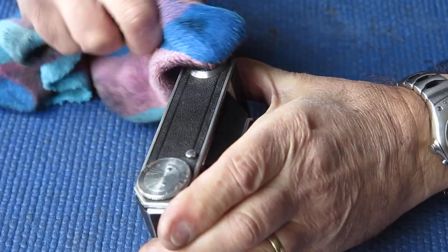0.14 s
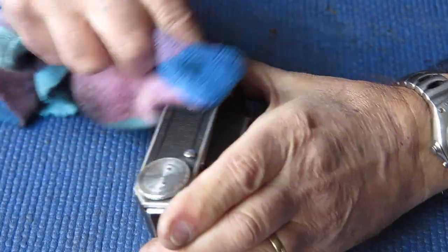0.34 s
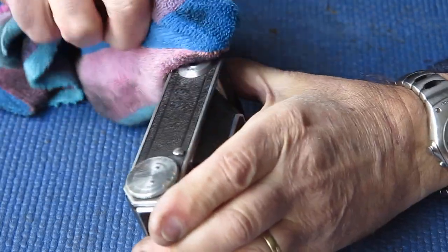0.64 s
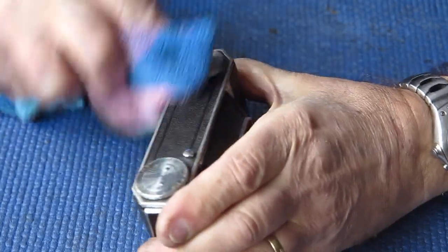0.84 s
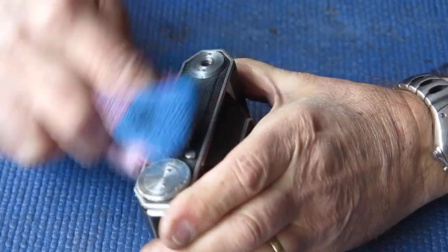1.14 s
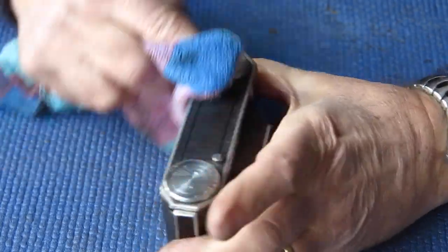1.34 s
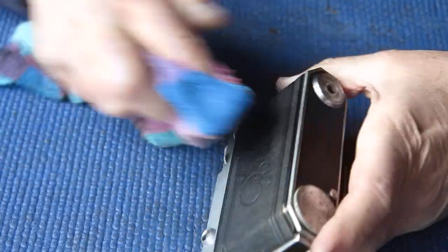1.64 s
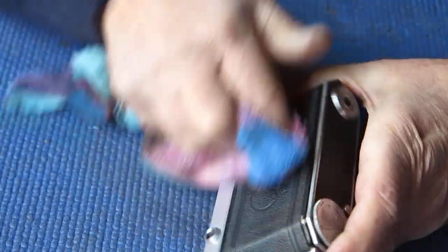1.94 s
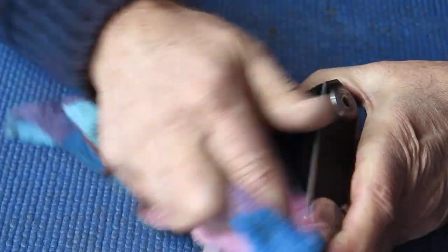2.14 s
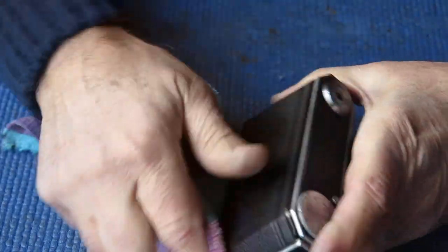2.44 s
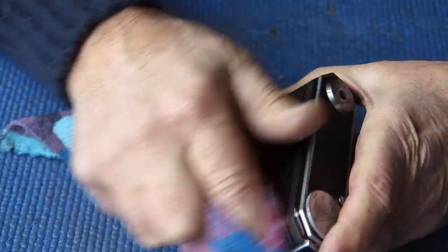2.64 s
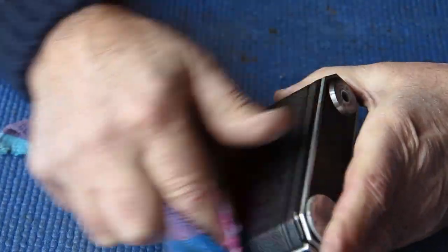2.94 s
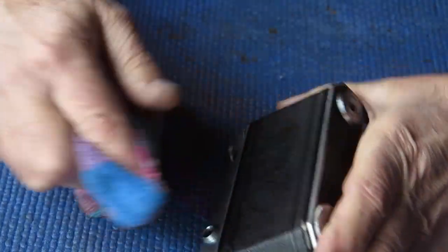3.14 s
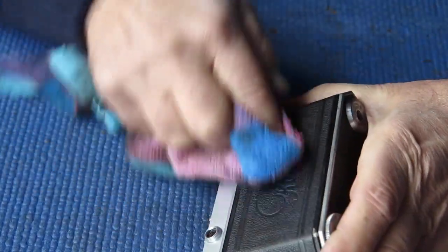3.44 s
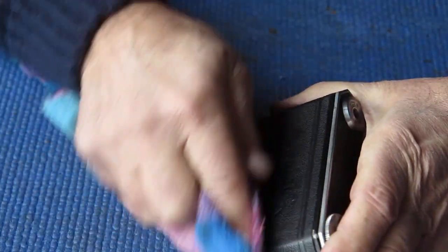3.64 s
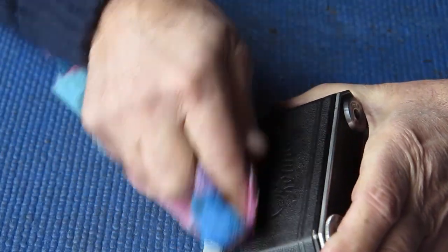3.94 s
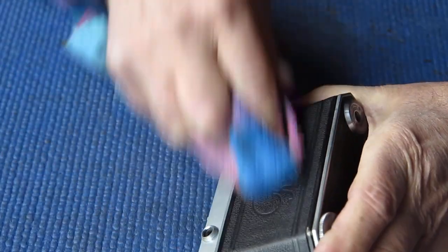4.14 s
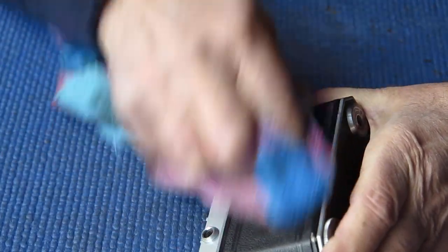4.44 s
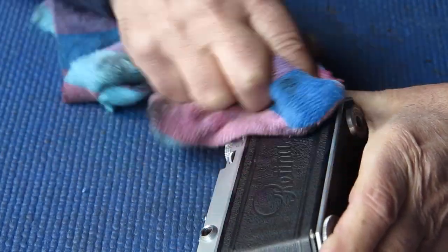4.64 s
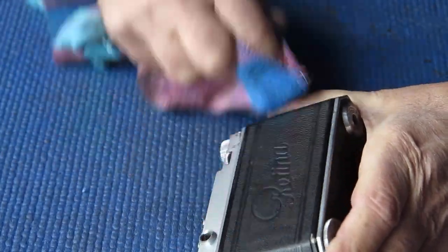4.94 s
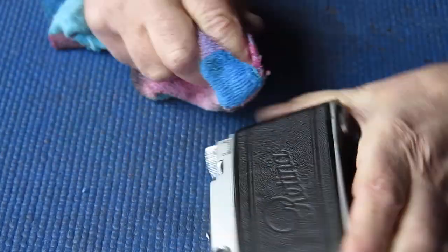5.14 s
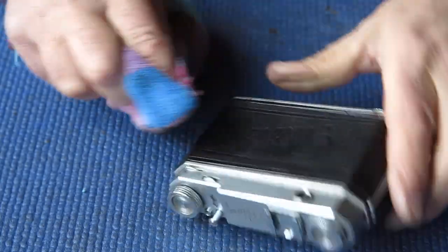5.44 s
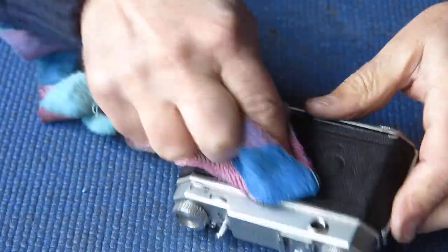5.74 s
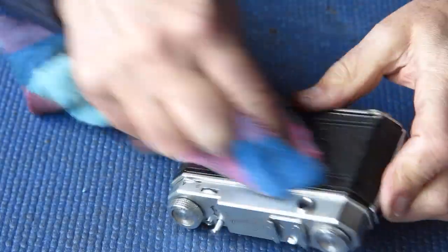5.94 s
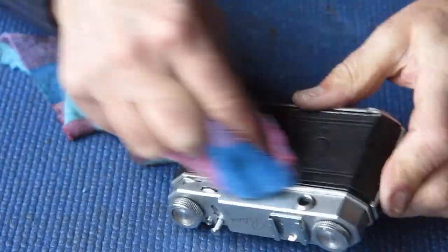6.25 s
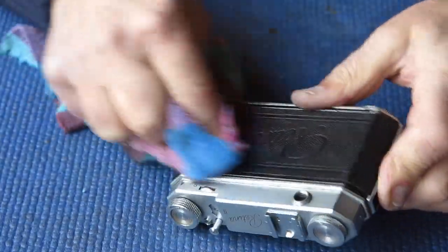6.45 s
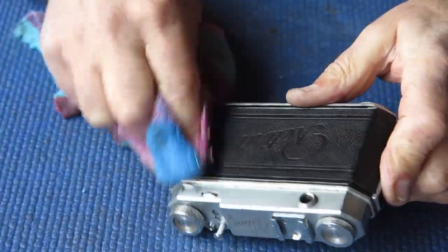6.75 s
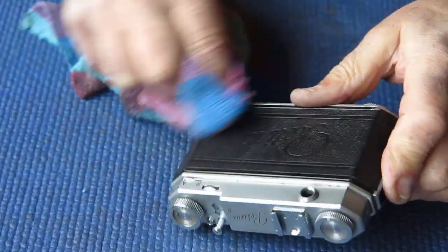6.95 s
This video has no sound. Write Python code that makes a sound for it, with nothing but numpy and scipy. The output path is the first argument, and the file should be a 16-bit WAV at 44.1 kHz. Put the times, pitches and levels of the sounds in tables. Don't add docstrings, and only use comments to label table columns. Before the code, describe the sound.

A terry cloth buffs a leather-covered hollow metal case in quick scratchy strokes, with low rumbles, knocks on a bench and a bright clink.

```python
import sys
import numpy as np
from scipy import signal
from scipy.fft import rfft, irfft, next_fast_len
from scipy.io import wavfile

SR = 44100
rng = np.random.default_rng(int(sys.argv[2]) if len(sys.argv) > 2 else 0)


def generate_wav(sig):
    pcm = np.round(np.clip(np.atleast_2d(sig).T, -1, 1) * 32767).astype(np.int16)
    wavfile.write(sys.argv[1], SR, pcm)


def gain_from_decibels(decibels):
    exponent = np.asarray(decibels, float) / 20
    return 10 ** exponent


N = 312669
SIZE = next_fast_len(N, True)
CONTROL_STEP = 64

# frequency in Hz, level in dB, 60 dB decay time in seconds.
SHELL_MODES = [(416, 8, 0.05), (518, 1, 0.073), (620, -1.5, 0.12), (735, 3.5, 0.039), (901, 8.5, 0.018),
               (1110, 3.5, 0.05), (1343, -0.5, 0.035), (1580, -12, 0.074), (1894, -19.5, 0.013)]


def cloth():
    hiss_gain, sheen_gain, scratch_gain, lower, upper, top = rubbing()
    hiss = fibre_hiss(hiss_gain, sheen_gain)
    scratch = scratch_gain * leather_scratch()
    rumble = shell_rumble(lower, upper, top)
    return gain_from_decibels(2.0) * hiss + gain_from_decibels(-1.94) * scratch + gain_from_decibels(-0.7) * rumble


def rubbing():
    # start in seconds, length in seconds, share spent speeding up (0-1),
    # hiss in dB, press on the shell in dB.
    side_strokes = [
        (0.173, 0.16, 0.61, -52.5, -58),
        (0.301, 0.16, 0.44, -51.5, -61),
        (0.438, 0.15, 0.47, -54.5, -62),
        (0.607, 0.2, 0.62, -60.5, -61),
        (0.785, 0.23, 0.28, -47, -50),
        (0.972, 0.125, 0.32, -45.5, -58),
        (1.09, 0.13, 0.28, -42, -49),
        (1.235, 0.29, 0.15, -45.5, -52.5),
    ]
    face_strokes = [(1.656, 0.26, 0.53, -42, -35), (1.853, 0.16, 0.57, -41, -34.5),
                    (1.984, 0.3, 0.2, -43, -40), (2.289, 0.22, 0.48, -45.5, -43.5),
                    (2.461, 0.18, 0.46, -44.4, -44), (2.623, 0.15, 0.36, -46.0, -49.5),
                    (2.738, 0.16, 0.34, -47.5, -47.5), (2.859, 0.24, 0.3, -48, -44.5),
                    (3.296, 0.23, 0.46, -52, -44.5), (3.474, 0.19, 0.51, -53.5, -49),
                    (3.624, 0.18, 0.44, -53.5, -54.5), (3.767, 0.19, 0.44, -56, -55.5),
                    (3.898, 0.22, 0.56, -51, -48), (4.078, 0.23, 0.33, -48.5, -42.5),
                    (4.221, 0.18, 0.46, -47, -46.5), (4.371, 0.19, 0.45, -47.5, -46),
                    (4.494, 0.19, 0.5, -46, -45), (4.649, 0.18, 0.41, -46, -38.5),
                    (4.778, 0.28, 0.35, -46.5, -41)]
    flat_strokes = [(5.485, 0.041, 0.52, -53, -62), (5.5, 0.31, 0.52, -48, -50.5),
                    (5.751, 0.15, 0.49, -52.5, -49), (5.893, 0.18, 0.21, -51.5, -40),
                    (6.007, 0.23, 0.49, -48.5, -50.5), (6.203, 0.16, 0.37, -52.5, -52.5),
                    (6.298, 0.39, 0.36, -48, -48), (6.612, 0.31, 0.23, -51, -57),
                    (6.74, 0.2, 0.58, -43, -35), (6.898, 0.16, 0.28, -47.5, -47.5),
                    (6.981, 0.2, 0.25, -48.5, -48)]
    slides = [
        (-0.1, 0.14, 0.46, -66, -64),
        (1.38, 0.23, 0.41, -47.5, -61),
        (1.48, 0.26, 0.46, -48.5, -58),
        (2.226, 0.24, 0.29, -56.5, -66),
        (3.037, 0.19, 0.41, -39.5, -80),
        (3.19, 0.23, 0.36, -51, -52),
        (5.057, 0.088, 1, -54.5, -54),
        (5.126, 0.19, 0.31, -47, -66),
        (5.232, 0.62, 0.13, -58, -63),
    ]
    # sheen dB, scratch dB, upper modes' share at top speed dB, power of speed in the shell, top modes dB
    kinds = [(side_strokes, (1, -8.5, -3.5, 2.1, -22)),
             (face_strokes, (0, -5, -2.5, 3, -10.5)),
             (flat_strokes, (1, -4.5, -1.5, 3.5, -23)),
             (slides, (-12, 1, -8, 3, -9))]
    power = 0
    for passes, (sheen_db, scratch_db, upper_db, by_speed, top_db) in kinds:
        for start, length, rising, hiss_db, shell_db in passes:
            pace = speed(start, length, rising)
            early = speed(start, length, 0.87 * rising)
            press_db = 0.15 * (shell_db - hiss_db)
            upper = np.clip(gain_from_decibels(upper_db) * pace ** 0.87, .05, .98)
            shell = gain_from_decibels(shell_db) * pace ** by_speed
            power = power + np.square([
                gain_from_decibels(hiss_db) * pace ** 1.8,
                gain_from_decibels(hiss_db + sheen_db) * early ** 2.6,
                gain_from_decibels(hiss_db + scratch_db + press_db) * pace ** 1.55,
                shell * np.sqrt(1 - upper ** 2),
                shell * upper,
                shell * pace ** 2 * gain_from_decibels(top_db)])
    points = np.arange(0, N, CONTROL_STEP)
    return [np.interp(np.arange(N), points, gain) for gain in np.sqrt(power)]


def speed(start, length, rising):
    part = np.clip((np.arange(0, N, CONTROL_STEP) / SR - start) / length, 0, 1)
    rising = np.clip(rising, .05, .95)
    return np.sin(np.pi / 2 * np.minimum(part / rising, (1 - part) / (1 - rising)))


def fibre_hiss(hiss_gain, sheen_gain):
    # frequency in Hz, level in dB per Hz.
    hiss_colour = [(1470, -1.5), (2500, -17), (3630, 1), (4020, 0.5), (4620, 0.5), (7300, 1.5), (9150, -3),
                   (11500, -11), (14500, -29.5), (16000, -65)]
    # frequency in Hz, width in Hz, lift in dB.
    port = (7150, 960, 4.2)
    slips = grains(14000, spread_db=2.0) * gain_from_decibels(1.2 * drift(20.5))
    hiss = rms_one(peaked(spread(slips, hiss_colour), [port]))
    sheen = signal.sosfiltfilt(butter(2, 8800, "high"), hiss)
    return hiss_gain * (hiss - sheen) + sheen_gain * sheen


def leather_scratch():
    # frequency in Hz, level in dB per Hz.
    scratch_colour = [(600, -20), (950, 4), (1250, -8), (1700, -3), (2300, -0.5), (3200, 0.5), (5000, -27)]
    catches = grains(5000, spread_db=2.5) * gain_from_decibels(1.2 * drift(53))
    return spread([[1], [.7]] * catches, scratch_colour)


def shell_rumble(lower, upper, top):
    catches = grains(1500, spread_db=1.8) * gain_from_decibels(2.0 * drift(67))
    modes = [rms_one(ring(catches, hz, .5 * t60)) * (-1) ** k
             for k, (hz, db, t60) in enumerate(SHELL_MODES)]
    palm, free = butter(2, [340, 1000], "band"), butter(2, 1000, "high")
    near = [[1], [.45]]
    rumble = lower * spread(near * signal.sosfilt(palm, sum(modes[:3])))
    rumble = rumble + upper * spread(near * signal.sosfilt(palm, sum(modes[3:5])))
    return rumble + top * spread(near * signal.sosfilt(free, sum(modes[6:])))


def knocks():
    # start in seconds, shell peak in dB, bench level in dB, pitch of the spot hit in Hz.
    hits = [(0.242, -56, -43, 401), (0.262, -53, -48, 600), (0.966, -54, -43, 404),
            (1.158, -37, -30.5, 401), (1.165, -40, -34.5, 401), (1.2497, -24, -23.5, 401),
            (1.262, -29, -32.5, 401), (1.374, -42, -46, 482), (1.494, -34.5, -68, 630),
            (1.93, -24, -45.5, 870), (1.946, -42, -59, 877), (2.026, -26, -48, 706), (2.036, -40, -43, 476),
            (2.049, -26, -51, 476), (2.297, -31, -47.5, 404), (2.311, -42, -50, 404),
            (2.424, -30.5, -44, 700), (2.532, -14, -42.5, 478), (2.961, -28.5, -61, 401),
            (4.406, -33, -65, 500), (4.42, -35, -62, 850), (4.685, -46, -65, 519), (5.091, -38.5, -62, 770),
            (5.918, -37, -55, 842), (6.94, -35.5, -44, 700)]
    # frequency in Hz, level in dB, 60 dB decay time in seconds.
    bench_modes = [(184, 0.5, 0.044), (230.4, 4.5, 0.11), (313.7, 1, 0.065), (397, -5.5, 0.11)]
    # frequency in Hz, level in dB, 60 dB decay time in seconds.
    metal_modes = [(390, -5, 0.0078), (738, -6.5, 0.03), (1430, -15, 0.012), (1138, -15.5, 0.045),
                   (1750, -13, 0.012), (2940, -11.5, 0.014), (3070, -5.5, 0.0052), (4040, -17, 0.016),
                   (4390, -6, 0.0054), (5230, 5, 0.002), (4900, -12, 0.017), (5790, -8, 0.017),
                   (6000, -16, 0.03), (6270, -8, 0.017), (7100, -10, 0.015), (7770, -12.5, 0.0092),
                   (9830, -8, 0.0035), (11800, -16, 0.0044)]
    # start in seconds, level in dB.
    clinks = [
        (3.3267, -9.5),
        (3.3347, -29),
        (3.339, -33),
    ]
    s, shell_db, bench_db, spot_hz = np.transpose(hits)
    bench = struck(bench_modes, s, bench_db + 3, 520)
    shell = struck(SHELL_MODES, s + 0.00091, shell_db - 12.0, 2100, spot_hz=spot_hz)
    clink = struck(metal_modes, *np.transpose(clinks), 12500, uneven_db=1.0)
    return bench + shell + small_ticks() + clink


def struck(modes, times, strength_db, contact_hz, uneven_db=3.5, spot_hz=None):
    at, out = (times * SR).astype(int), np.zeros(N)
    luck_db = uneven_db * rng.standard_normal((len(at), len(modes)))
    for k, (hz, db, t60) in enumerate(modes):
        far_db = 0 if spot_hz is None else -7.0 * np.abs(np.log2(hz / spot_hz))
        clicks = np.zeros(N)
        clicks[at] = gain_from_decibels(strength_db + db + far_db + luck_db[:, k]) * (-1) ** k
        out += ring(clicks, hz, t60)
    return signal.sosfilt(butter(2, min(contact_hz, .45 * SR)), out)


def small_ticks():
    # start in seconds, level in dB, frequency in Hz, 60 dB decay time in seconds.
    tick_rows = [(0.121, -44.5, 1350, 0.025), (1.111, -45, 3000, 0.0075), (1.2525, -17.5, 1100, 0.0063),
                 (1.2505, -20, 2060, 0.0041), (1.253, -31, 3050, 0.015), (1.253, -28, 4470, .008),
                 (1.264, -35, 3150, .015), (1.96, -27.5, 1500, 0.023), (2.027, -28, 2790, 0.006),
                 (2.299, -36, 1580, 0.011), (2.298, -40, 3400, .008), (2.96, -29, 1210, 0.026),
                 (3.924, -50, 3420, 0.028), (5.1718, -18.5, 3370, 0.004), (5.1722, -24, 9300, 0.0043),
                 (5.1722, -17, 5300, 0.0018), (5.1726, -27, 1500, 0.0051), (5.1722, -34, 11800, .003),
                 (5.173, -17.5, 7100, 0.0041), (5.1818, -19, 6900, .004), (5.439, -37, 4800, .015),
                 (5.441, -44, 7400, 0.022), (6.121, -41, 2190, 0.022)]
    contact_s = 0.00015
    ticks, t = np.zeros(N), np.arange(SR // 20) / SR
    for start, db, hz, t60 in tick_rows:
        envelope = gain_from_decibels(db - 60 * t / t60) * (1 - np.exp(-t / contact_s))
        ticks[round(start * SR):][:len(t)] += envelope * np.sin(2 * np.pi * hz * t)
    return signal.sosfilt(butter(2, 12000), ticks)


def bird():
    # start in seconds, length in seconds, first Hz, last Hz, level in dB, waver in Hz.
    peeps = [
        (1.392, 0.081, 7960, 8370, -45.5, 170),
        (2.212, 0.074, 7850, 8500, -48.5, 190),
        (3.17, 0.058, 9330, 9230, -42.5, 23),
        (3.213, 0.037, 9100, 9100, -51, 130),
        (4.057, .05, 9250, 9000, -58, 60),
        (4.924, .06, 9200, 9100, -57, 80),
        (5.617, 0.066, 9050, 9300, -56, 120),
        (6.311, 0.066, 9050, 9400, -51, 150),
        (6.355, 0.07, 9300, 9350, -47, 20),
    ]
    out, waver, flutter = np.zeros(N), drift(130), drift(90)
    for start, length, first_hz, last_hz, db, waver_hz in peeps:
        at = round(start * SR) + np.arange(round(length * SR))
        part = np.linspace(0, 1, len(at))
        hz = first_hz + (last_hz - first_hz) * part + waver_hz * waver[at]
        swell = gain_from_decibels(db + 2.8 * flutter[at]) * np.sin(np.pi * part)
        out[at] += swell * np.sin(2 * np.pi * np.cumsum(hz) / SR)
    return out


def room(x):
    t60_s = .3
    t = np.arange(SR // 2) / SR
    dull, bright = rng.standard_normal((2, 2, len(t)))
    dull = signal.sosfilt(butter(1, 2500), dull) * gain_from_decibels(-60 * t / t60_s)
    bright = 1.44 * bright * gain_from_decibels(-60 * t / (0.56 * t60_s))
    echoes = (dull + bright) * (t > .004)
    echoes = echoes / np.sqrt(np.sum(echoes ** 2) / 2)
    return signal.fftconvolve(x[None], echoes, axes=1)[:, :N]


def room_hum():
    # time in seconds, level in dB.
    gain_curve = [(0.0, -51), (0.65, -49.5), (0.93, -49), (1.22, -43), (1.4, -43.5), (1.56, -45),
                  (2.41, -46), (2.57, -45.5), (3.18, -45.5), (3.32, -50), (3.59, -54.5), (4.6, -51.5),
                  (4.86, -48.5), (5.21, -49), (5.35, -48.5), (6.75, -44.5), (6.91, -43.5), (7.09, -46)]
    # frequency in Hz, level in dB per Hz.
    hum_colour = [(15, -45), (25, -7), (123, 3.5), (229, 0), (317, -1.5), (575, -6), (1130, -12),
                  (1790, -16), (5140, -20), (7310, -19.5), (11900, -36.5), (14400, -57), (16000, -70)]
    # frequency in Hz, width in Hz, lift in dB.
    room_modes = [(112, 25, 6.5), (179, 25, 5.5), (301, 86, 7), (1154, 130, 5.5)]
    gain_db = np.interp(np.arange(N) / SR, *np.transpose(gain_curve))
    hum = rms_one(peaked(spread(rng.standard_normal((2, N)), hum_colour), room_modes))
    return gain_from_decibels(gain_db + 1.0 + 0.62 * drift(5.6)) * hum


def rms_one(x):
    return x / np.sqrt(np.mean(x ** 2) + 1e-20)


def butter(order, hz, kind="low"):
    return signal.butter(order, hz, kind, fs=SR, output="sos")


def at_hz(points):
    hz = np.maximum(np.arange(SIZE // 2 + 1) * SR / SIZE, 1)
    table_hz, value = np.array(points)[:, :2].T
    return np.interp(np.log(hz), np.log(table_hz), value)


def drift(rate):
    r = np.exp(-2 * np.pi * rate / SR)
    noise = rng.standard_normal(N + SR)
    return rms_one(signal.lfilter([1], [1, -2 * r, r * r], noise)[SR:])


def ring(clicks, hz, t60):
    r, w = gain_from_decibels(-3 * 20 / (t60 * SR)), 2 * np.pi * hz / SR
    return signal.lfilter([0, np.sin(w)], [1, -2 * r * np.cos(w), r * r], clicks + 1e-18)


def grains(per_s, spread_db):
    sizes = gain_from_decibels(spread_db * np.minimum(rng.exponential(1, (2, N)), 5))
    signs = rng.choice([-1, 1], (2, N))
    return sizes * signs * (rng.random((2, N)) < per_s / SR)


def spread(pair, spectrum=((1, 0), (2, 0))):
    # frequency in Hz, left-right likeness (0-1).
    likeness = [(25, 0.43), (90, 0.92), (200, 0.61), (800, 0.28), (2000, 0.48), (5000, 0.52), (9000, 0.076),
                (14000, 0.33)]
    common, other = rfft(pair, SIZE) * gain_from_decibels(at_hz(spectrum))
    alike = np.clip(at_hz(likeness), 0, 1)
    ears = np.sqrt(1 + alike) * common + np.sqrt(1 - alike) * other * [[1], [-1]]
    return rms_one(irfft(ears, SIZE)[:, :N])


def peaked(x, peaks):
    hz = np.arange(SIZE // 2 + 1) * SR / SIZE
    lift_db = sum(db / (1 + (2 * (hz - mid_hz) / width) ** 2) for mid_hz, width, db in peaks)
    return irfft(rfft(x, SIZE) * gain_from_decibels(lift_db), SIZE)[:, :N]


def scene():
    hits, peeps = knocks(), bird()
    thin = signal.sosfilt(butter(1, [900, 13000], "band"), hits)
    steady = cloth() + room_hum() + gain_from_decibels(-3.5) * room(thin)
    steady = signal.sosfilt(signal.cheby2(8, 40, 15750, fs=SR, output="sos"), steady)
    return steady + hits + 0.75 * peeps + 0.39 * room(peeps)


def top_cut(x):
    return signal.sosfilt(signal.butter(12, 16530, fs=SR, output="sos"), x)


def record(dry):
    # frequency in Hz, left minus right in dB.
    lean_db = [(30, 7), (150, 2.5), (600, 2.5), (1300, 1.2), (2400, 1), (4400, -0.5), (6500, -7.5),
               (8200, -8), (10000, 10), (12500, 12), (15000, 5)]
    lean = gain_from_decibels(at_hz(lean_db) / 2 * [[1], [-1]])
    mix = irfft(rfft(dry, SIZE) * lean, SIZE)[:, :N]
    return top_cut(mix)


dry = scene()
out = record(dry)
generate_wav(out)
```